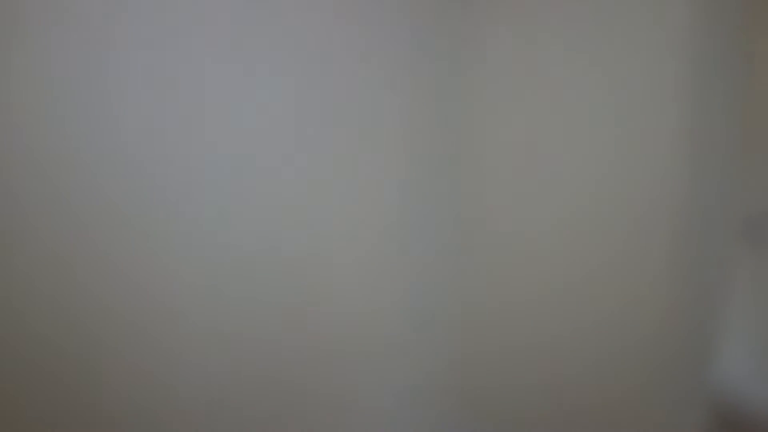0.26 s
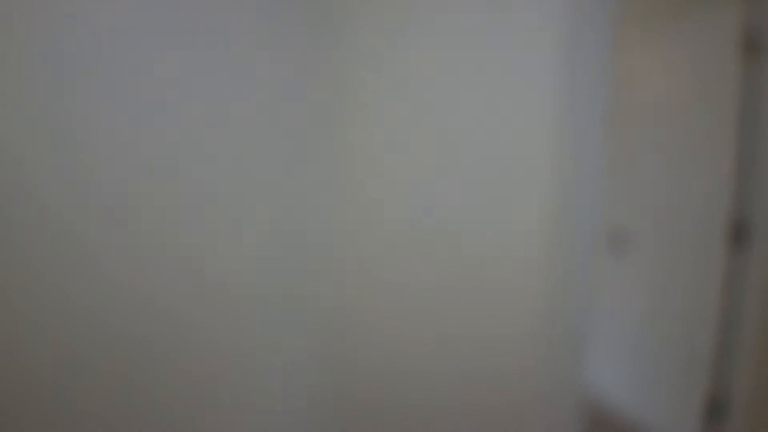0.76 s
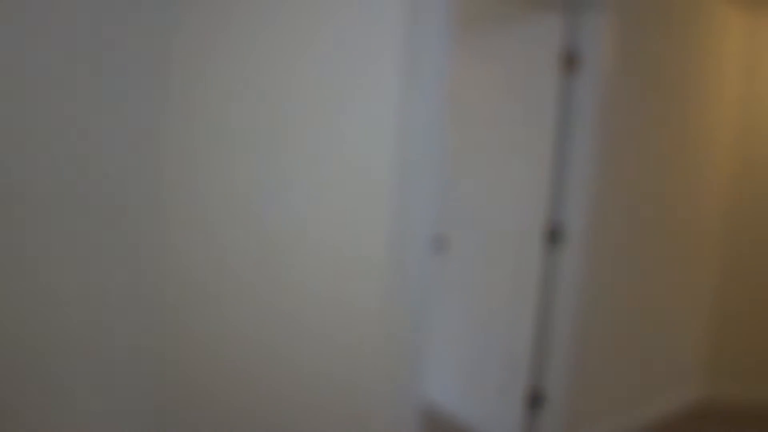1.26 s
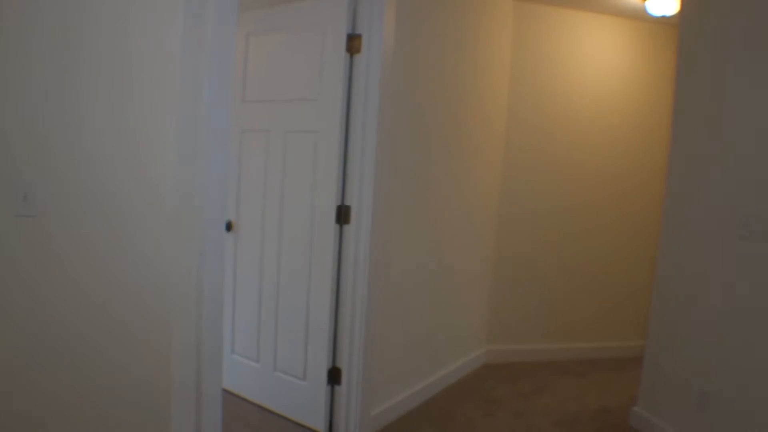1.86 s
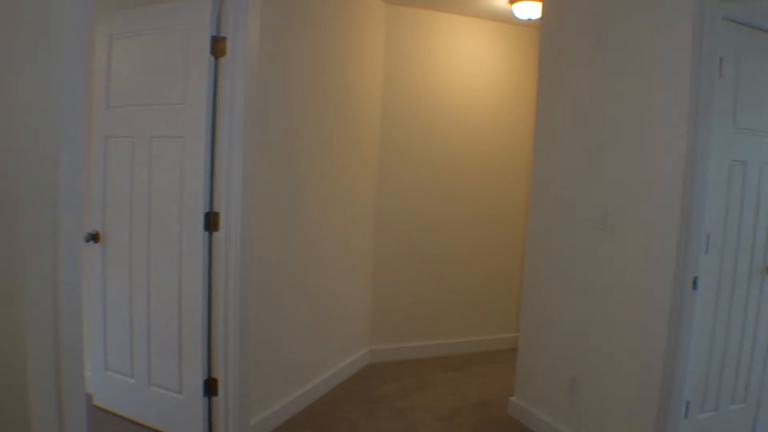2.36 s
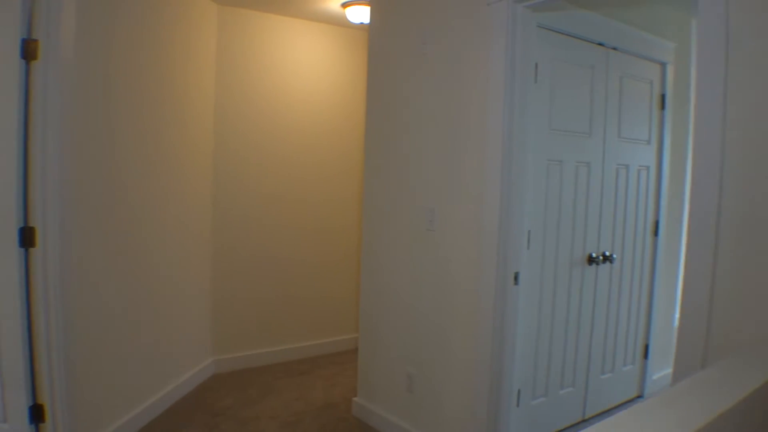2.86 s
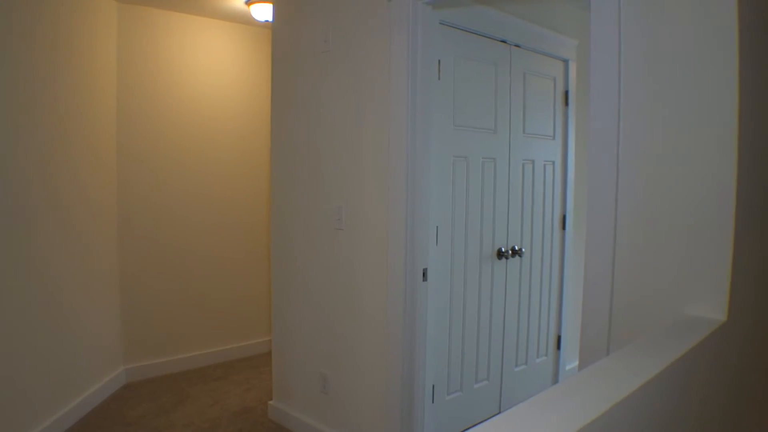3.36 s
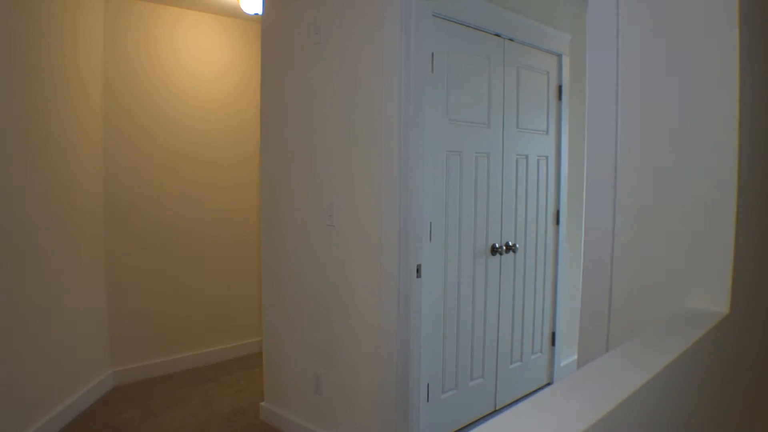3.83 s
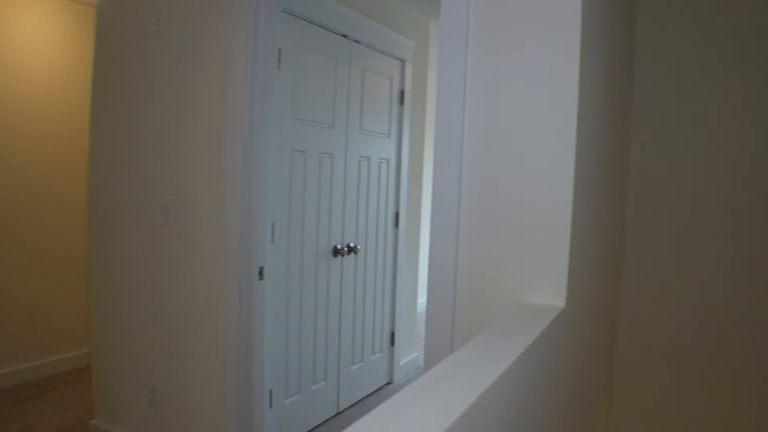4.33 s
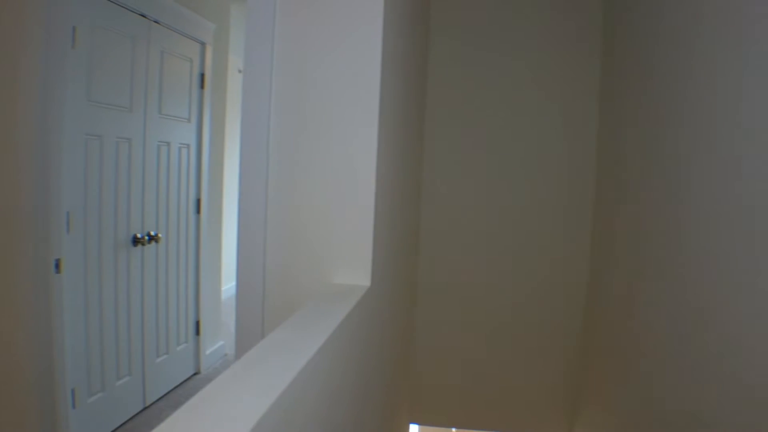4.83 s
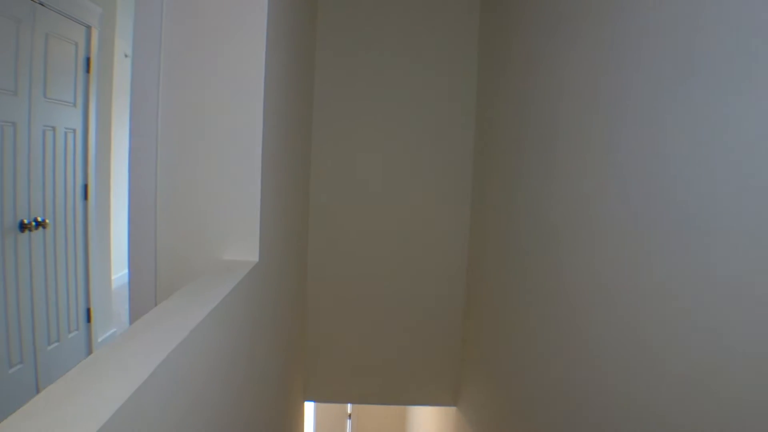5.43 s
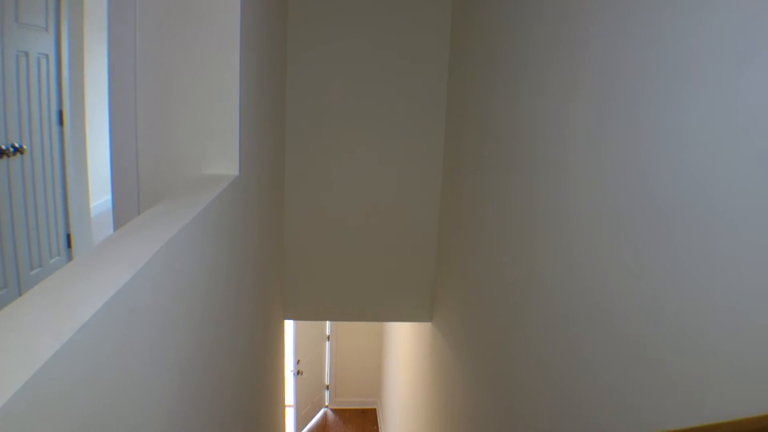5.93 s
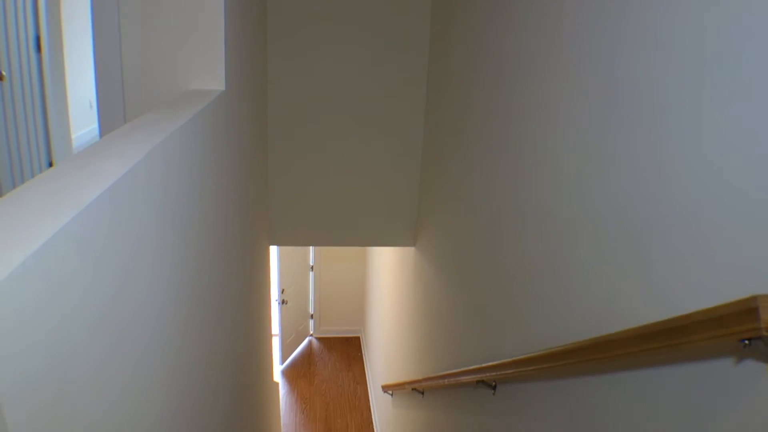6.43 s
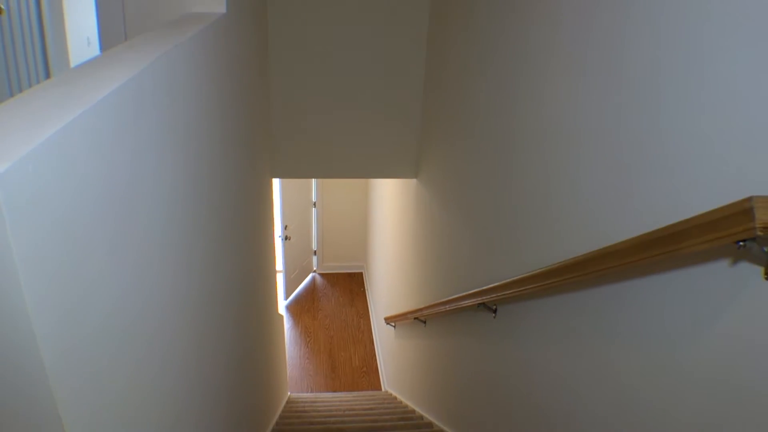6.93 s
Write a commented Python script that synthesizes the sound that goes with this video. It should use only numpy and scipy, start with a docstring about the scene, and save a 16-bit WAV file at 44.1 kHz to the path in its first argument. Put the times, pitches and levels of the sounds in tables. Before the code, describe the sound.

A bare, empty house interior, heard from a handheld microphone carried by the walker. Faint steady room murmur and hiss run throughout, with very soft uneven clothes rustle. At about 1.2 s a light footfall leads into a strong, dull thump near 1.3 s, low and muffled by carpet, ringing between bare walls for about half a second. Softer steps follow at 1.8 and, fainter, 2.1 s. After a quiet gap, the loudest and slightly harder thud lands at 3.6 s, and a sole drags faintly over the pile until about 4.2 s. A dull, softer double thump comes at 4.35 s, with a weak touch at 4.5. Tiny grip squeaks appear around 4.9 and 5.2 s. A barely audible footfall at 5.7 s is followed by rustle and hiss, a dry tick near 6.1 s, and small low handling ticks with a faint squeak around 6.8 to 6.9 s.

```python
"""Footsteps thump the carpeted wooden landing of an empty house, and its bare walls ring for half a second.
Each footfall is a burst of echoes dulled by sole and carpet, plus sine waves for the ringing floor.
A sole drags between two steps and clothes rustle: both are coloured noise with an uneven level.
A camera in the walker's hand ticks and squeaks: short noise bursts through a resonance.
Underneath lies faint, steady noise for room air and microphone hiss."""
import sys
import numpy as np
from scipy import signal
from scipy.fft import rfft, irfft
from scipy.io import wavfile
from scipy.ndimage import uniform_filter1d

SR = 44100
rng = np.random.default_rng(int(sys.argv[2]) if len(sys.argv) > 2 else 0)


def transcribe(signal):
    """Save signal, clipped to [-1, 1], as a 16-bit WAV file at the path in sys.argv[1]."""
    frames = np.atleast_2d(signal).T
    limited = np.clip(frames, -1, 1)
    pcm = np.round(limited * 32767).astype(np.int16)
    wavfile.write(sys.argv[1], SR, pcm)


N = 316936
TIME = np.arange(N) / SR

# Blows of heels and soles on the floor; levels are relative to the gain in footsteps():
# (t/s, level/dB, hardness as treble corner f/Hz, bass corner of the spot f/Hz, floor ring level/dB)
STEPS = [ (1.164, -51.5, 570, 130, -8), (1.271, -27.5, 520, 160, -3), (1.339, -15, 640, 161, -7),
         (1.345, -41, 1660, 228.6, -1), (1.817, -27.5, 574, 193, -8), (2.126, -37.5, 444, 185, -8),
         (3.559, -36, 720, 187, 2.5), (3.614, -10.5, 850, 200, -3.5), (3.627, -29.5, 1660, 235, -4),
         (4.35, -23, 586, 196, -2), (4.365, -19, 468, 197, 0.5), (4.536, -33.5, 306, 202, -9),
         (5.649, -34, 1740, 230, -10.5), (5.696, -49, 800, 250, -16)]


def footsteps(gain_db=23):
    """All footfalls along the landing, each a blow of a foot on the floor."""
    track = np.zeros((2, N))
    for start_s, level_db, heel_hz, bass_hz, ring_db in STEPS:
        blow = footfall(heel_hz, bass_hz, ring_db)
        add(track, start_s, undb(level_db + gain_db) * blow)
    return track


KNOCK_DB, STEP_RISE_S = -1.5, 0.00074  # level of the first knock; how gradually the foot loads the boards
USUAL_HEEL_HZ, CARPET_HZ = 610, 1490  # treble corner of an ordinary step, and where the pile cuts it off
CRUSH = 1.6  # a harder heel crushes the pile: octaves of cut-off per octave of hardness


def footfall(heel_hz, bass_hz, ring_db, tail_db=-2, sub_db=-33):
    """One blow: the boards knock, then floor and hallway ring."""
    t = np.arange(SR) / SR
    f = freqs(SR) + 1
    # the heel's give rounds the blow, and the carpet pile swallows what is left of the treble
    carpet_hz = CARPET_HZ * (heel_hz / USUAL_HEEL_HZ) ** CRUSH
    contact = roll_off(f / heel_hz, slope=2.81) * roll_off(f / carpet_hz, slope=2.7)
    # the boards give off little sound below their bass corner
    radiation = undb(sub_db) + roll_off(bass_hz / f, slope=4.3)
    build = 1 - np.exp(-t / STEP_RISE_S)  # a rolling sole loads the floor gradually
    knock = undb(KNOCK_DB) * unit(even(first_knock(t)))
    tail = undb(tail_db) * unit(even(hall_tail(t)))
    echoes = even((knock + tail) * build)
    thud = unit(shape(echoes, contact * radiation * boards(f)))
    ring = unit(shape(floor_ring(t) * build, contact * radiation))
    return unit(thud + undb(ring_db) * ring)


def first_knock(t, knock_s=0.015, echoes_per_s=900, blur=0.071):
    """The blow and early echoes off the near walls: scattered clicks in a little noise, dying fast."""
    arrivals = rng.random(len(t)) < echoes_per_s / SR
    pulses = arrivals * np.sign(rng.standard_normal(len(t)))
    echoes = pulses + blur * stereo_noise(len(t), CLOTH_LIKENESS)
    return echoes * np.exp(-t / knock_s)


# How long the bare hallway takes to die away by 60 dB: (f/Hz, decay time/s)
HALL_T60 = [(100, 0.4), (330, 0.54), (700, 0.41), (1800, 0.46), (5000, 0.53)]
# How alike footfalls, and the dragging sole, are at the two microphones: (f/Hz, coherence [1 = identical])
STEP_LIKENESS = [(130, 0.98), (260, 0.98), (550, 0.98), (1160, 0.58), (2430, 0.58), (5080, .2),
                 (10600, 0.096)]


def hall_tail(t):
    """Dense echoes between bare walls; each octave dies at its own rate."""
    noise = rfft(stereo_noise(len(t), STEP_LIKENESS))
    octave = np.log2(np.clip(freqs(len(t)) / 100, 1, 128))  # octaves above 100 Hz
    tail = 0
    for k in range(8):
        t60 = over_hz(HALL_T60, 100 * 2 ** k)
        overlap = np.maximum(1 - abs(octave - k), 0)  # neighbouring octaves fade into each other
        band = irfft(noise * overlap, len(t))
        tail = tail + band * die_away(t, t60)
    return unit(tail)


# Resonances of floor and hallway, before small random changes:
# (f/Hz, relative level/dB, time to fall by 60 dB/s)
FLOOR_MODES = [(121, -22.5, 0.23), (152, -18, 0.28), (179, -10, 0.32), (205.2, -9.5, 0.58),
               (243.2, 3, 0.35), (298.8, -5.5, 0.53), (355, -0.5, 0.37), (380.7, -6, 0.14),
               (428, -12, 0.45), (491, -7.5, 0.59), (534, -2.5, 0.29), (602, -3, 0.4), (673.6, -1, 0.27),
               (695, -3.5, 0.17), (762, -12, .35), (862, -2, 0.25), (1033, -13.5, 0.25), (1040, -8.5, 0.42),
               (1154, -13.5, 0.37), (1228, -9, .3), (1243, -0.5, 0.35), (1480, -12, 0.3), (1720, -9, 0.33),
               (1670, -16.5, .28), (1840, -7.5, 0.21), (2200, -3.5, .27)]


def floor_ring(t, scatter_db=3, detune=0.0017):
    """The low resonances; each blow excites them a little differently."""
    hz, db, t60 = np.transpose(FLOOR_MODES)[:, :, None]
    size, pitch, turn = rng.standard_normal((3, len(hz), 1))
    waves = np.sin(2 * np.pi * (hz * (1 + detune * pitch) * t + turn))
    levels = undb(db + scatter_db * size)
    return np.sum(levels * waves * die_away(t, t60), axis=0)


# Broad colour of the boards under the carpet: (f/Hz, relative level/dB)
BOARDS = [(40, 1), (90, -2.5), (125, 1.5), (160, -3.5), (240, -6), (275, -2), (370, 0), (720, -0.5),
          (930, 0), (1450, 3), (2200, 2.5), (3200, 5.5), (5000, 5), (11000, 2.5)]


def boards(f, width_hz=22, between_db=-7):
    """Gain of the floor: broad colour, with a hump at every resonance."""
    hz, db, _ = np.transpose(FLOOR_MODES)[:, :, None]
    humps = np.sum(undb(db) ** 2 / (1 + (2 * (f - hz) / width_hz) ** 2), axis=0)
    return undb(over_hz(BOARDS, f)) * np.sqrt(humps + undb(between_db) ** 2)


DRAG_START_S, DRAG_ATTACK_S, DRAG_HOLD_S = 3.677, 0.096, 0.44
DRAG_DB, DRAG_SAG_DB_PER_S = -54.5, 15.5
DRAG_LIFT_DB_PER_S = 85  # extra fall once the sole lifts, on top of the sag
# Colour of the sole rubbing the carpet pile: (f/Hz, relative level/dB)
PILE = [(60, -25), (150, -31), (260, -6), (380, -2), (450, -10), (550, 5), (680, -7), (830, -3),
        (1000, -12), (1900, -13.5), (4000, -55)]


def dragging_sole():
    """One stroke over the pile: the sole bites, eases as the weight leaves it, and lifts."""
    since = TIME - DRAG_START_S
    bite = np.clip(since / DRAG_ATTACK_S, 0, 1)
    held_s = np.maximum(since - DRAG_ATTACK_S, 0)
    lifted_s = np.maximum(held_s - DRAG_HOLD_S, 0)
    db = DRAG_DB - DRAG_SAG_DB_PER_S * held_s - DRAG_LIFT_DB_PER_S * lifted_s
    return bite * undb(db) * rubbing(PILE, STEP_LIKENESS, grip_db=0.5, grain_db=1.0)


# Rustle of clothes moving with the walker: (t/s, level/dB)
MOTION = [(0.0, -60.5), (0.32, -58.5), (0.9, -64), (1.25, -62.5), (1.7, -63.5), (2.1, -67.5),
          (2.699, -66.5), (3.0, -74.5), (3.5, -72), (3.65, -64.5), (4.6, -61.0), (4.78, -66.5), (5.17, -61),
          (5.55, -59.0), (5.85, -62.5), (6.25, -63), (6.6, -67), (7.19, -65)]
# Colour of the rustle: (f/Hz, relative level/dB)
CLOTH = [(40, -25), (110, -19.5), (190, -16), (300, -3.5), (550, -1.5), (1000, -3.5), (1600, -5),
         (2500, -9.5), (3600, -10), (5000, -15.5), (7000, -14), (11000, -17.5)]
# How alike it is at the two microphones, also for knocks and handling: (f/Hz, coherence [1 = identical])
CLOTH_LIKENESS = [(260, .92), (550, 0.67), (1160, 0.42), (2430, 0.21), (5080, 0.24), (10600, 0.017)]


def clothes():
    """Clothes rustle as much as the walker moves."""
    s, db = np.transpose(MOTION)
    motion = undb(np.interp(TIME, s, db))
    return motion * rubbing(CLOTH, CLOTH_LIKENESS, grip_db=1.5, grain_db=0.3)


def rubbing(spectrum, likeness, grip_db, grain_db):
    """Fabric friction: the fibres catch and let go in patches, with a finer grain on top."""
    unevenness_db = grip_db * walk(35) + grain_db * walk(430)
    return coloured(spectrum, likeness) * undb(unevenness_db)


TICK_WIDTH, SQUEAK_WIDTH = 0.68, 0.1  # bandwidth as a share of the centre frequency
# Dry handling ticks; levels are relative to the gain in handling():
# (t/s, level/dB, centre f/Hz, decay of the noise burst/s)
TICKS = [(1.285, -56, 7000, .003), (2.786, -54.5, 2000, 0.0007), (6.054, -54, 8500, .015),
         (6.784, -59, 450, 0.0029), (6.837, -56, 430, 0.0053), (6.932, -52.5, 513, 0.0014)]
# Faint squeaks of the grip, same columns: (t/s, level/dB, centre f/Hz, decay of the noise burst/s)
SQUEAKS = [(.115, -56, 2780, 0.011), (4.89, -52, 4100, 0.016), (5.173, -48, 1520, 0.021),
           (6.797, -55.5, 4200, .038)]


def handling(touches, width, gain_db=19):
    """Fingers on the camera: a wide resonance ticks, a narrow one squeaks."""
    track = np.zeros((2, N))
    t = np.arange(SR) / SR
    f = freqs(SR) + 1
    for start_s, level_db, hz, decay_s in touches:
        casing = 1 / np.sqrt(1 + ((f - hz ** 2 / f) / (width * hz)) ** 2)  # one damped resonance
        burst = stereo_noise(SR, CLOTH_LIKENESS) * np.exp(-t / decay_s)
        add(track, start_s, undb(level_db + gain_db) * unit(shape(burst, casing)))
    return track


AIR_DB = -65
# Colour of the room air and hiss: (f/Hz, relative level/dB)
AIR = [(25, -11.5), (60, -17.5), (120, -11.5), (200, -5), (260, -2), (350, 0.5), (500, -2), (680, -8.5),
       (1000, -7.5), (2000, -2.5), (2400, -7.5), (5000, -6.5), (11000, -9.5)]
# How alike it is at the two microphones: (f/Hz, coherence [1 = identical, below 0 = opposed])
AIR_LIKENESS = [(60, .85), (260, 0.68), (550, .3), (1160, -0.33), (10600, -0.013)]


def room_air():
    """Low murmur of the house and microphone hiss, together as one steady noise."""
    return coloured(AIR, AIR_LIKENESS) * undb(AIR_DB)


def undb(db):
    """Decibels to gain."""
    return 10 ** (np.asarray(db) / 20)


def over_hz(points, f):
    """Read (f/Hz, value) points on a log-frequency axis."""
    hz, value = np.transpose(points)
    return np.interp(np.log(f + 1), np.log(hz), value)


def freqs(size):
    """Frequencies of the spectrum of a sound of this length."""
    return np.fft.rfftfreq(size, 1 / SR)


def unit(x):
    """Scale to an average energy of 1 per channel."""
    return x / np.sqrt(np.mean(np.sum(x ** 2, axis=-1)))


def die_away(t, t60):
    """Smooth fade that falls by 60 dB in t60 seconds."""
    return np.exp(-np.log(1000) * t / t60)


def roll_off(ratio, slope):
    """Gain near 1 below a ratio of 1, then falling 6 dB an octave per unit of slope."""
    return 1 / np.sqrt(1 + ratio ** (2 * slope))


def shape(x, gain):
    """Causal (minimum-phase) filter with the given gain at each frequency."""
    size = x.shape[-1]
    cepstrum = irfft(np.log(gain + 1e-9), size)
    # folding the second half onto the first makes the filter act only after its input
    cepstrum[1:size // 2] *= 2
    cepstrum[size // 2 + 1:] = 0
    return irfft(rfft(x) * np.exp(rfft(cepstrum)), size)


def even(x, span_hz=220):
    """Level out the broad humps of a burst of echoes and keep its fine grain."""
    power = np.mean(abs(rfft(x)) ** 2, axis=0)
    smooth_power = uniform_filter1d(power, int(span_hz * x.shape[-1] / SR))
    return shape(x, smooth_power ** -.5)


def stereo_noise(size, likeness):
    """White noise at two microphones, as alike at each frequency as the table says."""
    c = np.clip(over_hz(likeness, freqs(size)), -.999, .999)
    shares = np.sqrt([(1 + c) / 2, (1 - c) / 2])
    mid, side = rfft(rng.standard_normal((2, size))) * shares
    return irfft(np.array([mid + side, mid - side]), size)


def coloured(spectrum, likeness):
    """Steady stereo noise of rms 1 with the given spectrum."""
    gain = undb(over_hz(spectrum, freqs(N)))
    return unit(shape(stereo_noise(N, likeness), gain)) * np.sqrt(N)


def walk(rate):
    """Random levels joined by straight lines, rate of them a second."""
    return np.interp(TIME * rate, np.arange(4096), rng.standard_normal(4096))


def add(track, s, sound):
    """Mix a sound into the track at time s."""
    start = max(int(s * SR), 0)
    part = sound[..., :N - start]
    track[:, start:start + part.shape[-1]] += part


def scene():
    """Steps, friction and handling over the quiet house."""
    fingers = handling(TICKS, TICK_WIDTH) + handling(SQUEAKS, SQUEAK_WIDTH)
    return footsteps() + dragging_sole() + clothes() + fingers + room_air()


TOP_HZ = 11100
# Balance of the two microphones: (f/Hz, left minus right level/dB)
BALANCE = [(60, 0), (200, -0.8), (550, -1.6), (1100, -2), (2200, -2.5), (6000, -2), (10600, -3)]


def record(dry):
    """The right microphone is a little brighter; the top is cut steeply."""
    half_db = over_hz(BALANCE, freqs(N)) / 2
    tilt = undb(np.array([[1], [-1]]) * half_db)
    sound = irfft(rfft(dry) * tilt, N)
    top_cut = signal.ellip(12, .1, 70, TOP_HZ, fs=SR, output="sos")  # ripple 0.1 dB, stop band -70 dB
    return signal.sosfilt(top_cut, sound)


dry = scene()
out = record(dry)
transcribe(out)
```